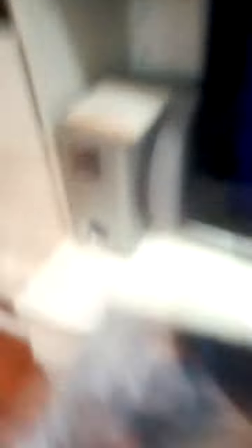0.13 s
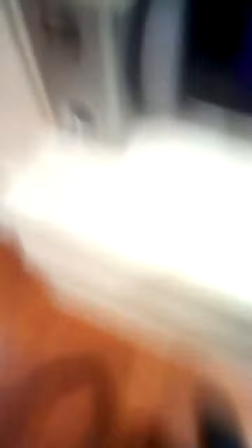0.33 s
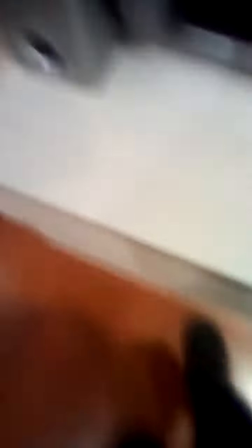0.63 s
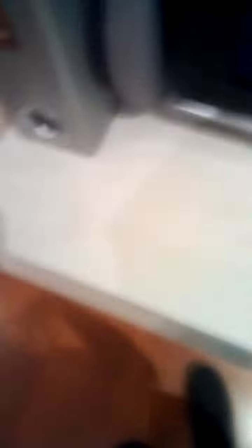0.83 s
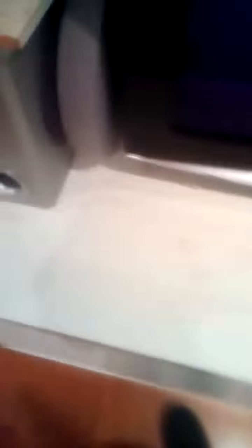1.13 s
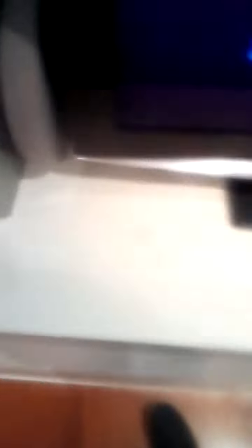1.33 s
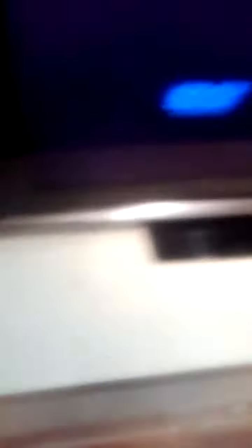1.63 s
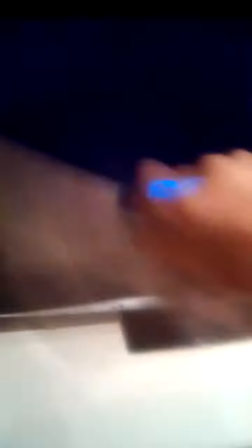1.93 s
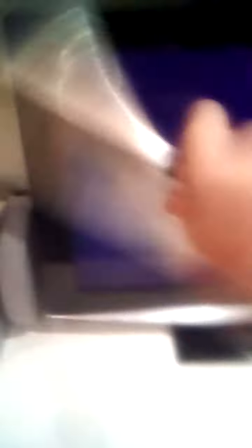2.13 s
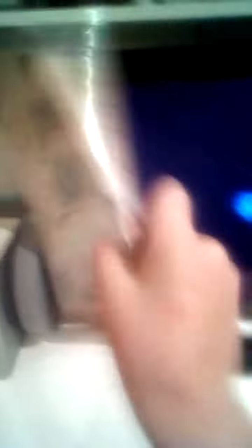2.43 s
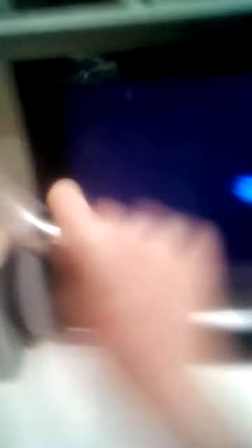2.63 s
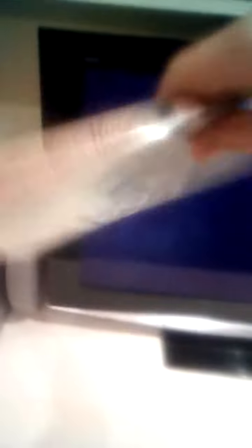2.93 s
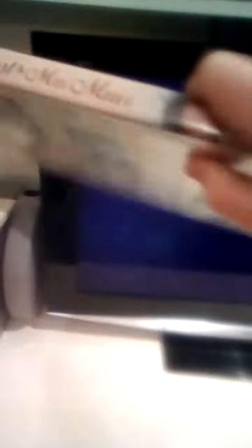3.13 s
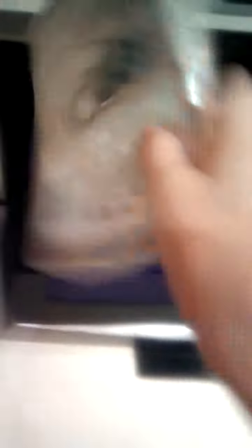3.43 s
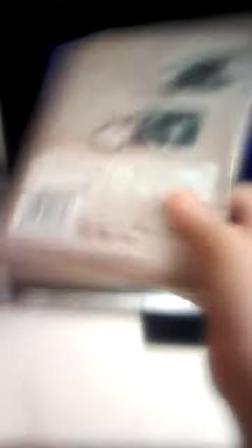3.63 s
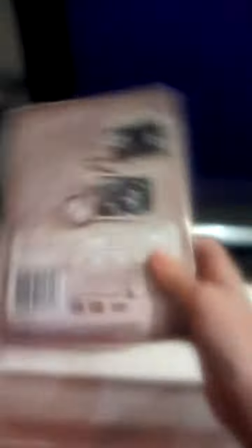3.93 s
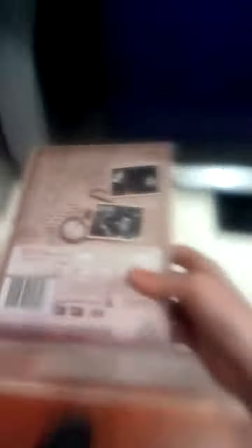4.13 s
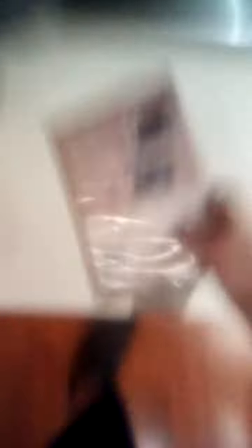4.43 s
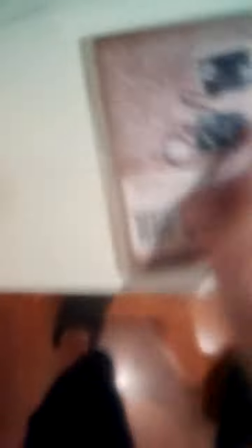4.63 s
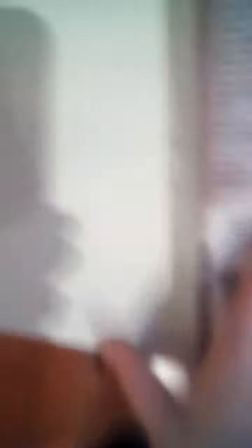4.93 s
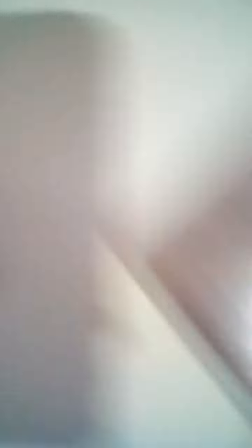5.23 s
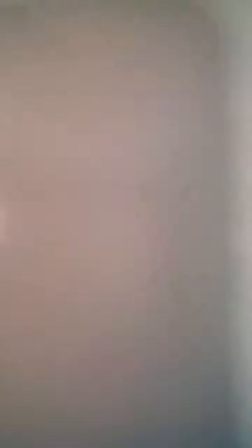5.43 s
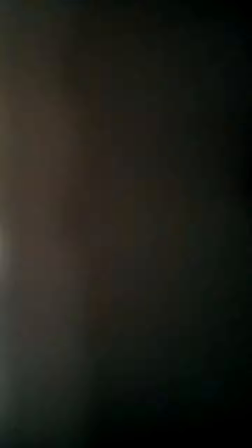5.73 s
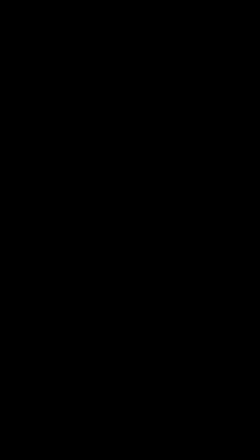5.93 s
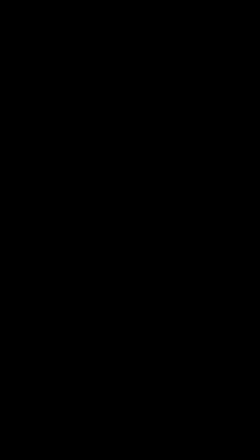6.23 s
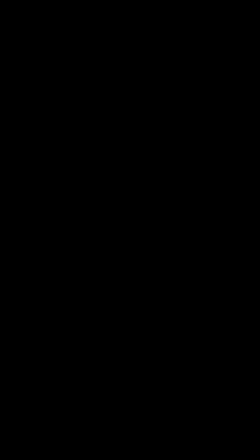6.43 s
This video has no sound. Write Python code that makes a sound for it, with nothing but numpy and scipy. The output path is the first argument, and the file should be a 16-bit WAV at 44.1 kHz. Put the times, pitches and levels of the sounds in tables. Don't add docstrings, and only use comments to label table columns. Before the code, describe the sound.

A small hard indoor room with a faint low hum and soft hiss; everything is close to a hand-held phone, stereo, with dulled, patchy treble. At 0 s loose plastic rattles lightly. From 0.38 to 0.65 s a run of hollow snaps and dull knocks comes with finger scrapes. It eases, then a snap at 1.23 s. From 1.4 to 2.7 s small catches click, a disc taps its hub, and two firmer snaps sound at 1.98 and 2.13 s; a bright skin brush at 2.5. Around 3 s it is nearly quiet, with tiny squeaks; light taps return at 3.5-4.05. The case lands at 4.22, then cracks very sharply at 4.42-4.6 with rattle and scraping. Softer thuds and rubbing run to 5.5. From 5.6 to 5.95 s the phone clatters down in loud, rapid booming knocks and hard ticks. A faint table tone fades under small rattles at 6.25-6.53 s.

```python
import sys
import numpy as np
from scipy import signal
from scipy.io import wavfile
from scipy.ndimage import uniform_filter1d, minimum_filter1d

SR = 44100
rng = np.random.default_rng(int(sys.argv[2]) if len(sys.argv) > 2 else 0)


def boost_factor(decibels):
    exponent = np.asarray(decibels, float) / 20
    return 10 ** exponent


def generate_wav(signal):
    frames = np.transpose(np.atleast_2d(signal))
    scaled = np.clip(frames, -1, 1) * 32767
    pcm = np.round(scaled).astype(np.int16)
    wavfile.write(sys.argv[1], SR, pcm)


N = 289737

# frequency in Hz, density in dB per Hz.
ROOM_NOISE = [(15, -51), (25, -33.5), (108, 4.5), (130, -15.5), (229, -13), (745, -21), (2540, -22.5),
              (4470, -26), (5030, -27), (7000, -28), (9100, -60.5), (15400, -120)]
# frequency in Hz, likeness from -1 to 1.
NOISE_LIKENESS = [(60, 0.88), (380, 0.34), (2380, -0.18), (15000, -0.05)]
# frequency in Hz, density in dB per Hz.
MIC_HISS = [(4410, -61), (7500, -12.5), (8670, -2), (9700, -9.5), (10500, -5.5), (12700, -8), (14900, 0.5),
            (15900, 2.5), (16000, -15), (16500, -31)]
# frequency in Hz, gain in dB.
MIC_RESPONSE = [(30, 4.5), (5500, 0.5), (6500, 2), (7600, -9), (8300, -18), (10500, -19.5), (13700, -24),
                (14300, -17.5), (15200, -14), (16200, -20), (16800, -66)]
# frequency in Hz, t60 in seconds.
ROOM_DECAY = [(200, 0.15), (1000, 0.32), (3000, 0.32), (7000, 0.37)]
# frequency in Hz, share of patches kept.
TREBLE_KEPT = [(7400, 1.), (8200, .8), (12000, .7), (14000, .3), (14400, 1.), (15500, 1.), (15750, .01)]

# time in seconds, rumble of the grip in dB, side of the case as left-right dB.
HANDS = [(0.0, -54.5, 2.5), (0.3, -65.5, 2.5), (0.5, -52.5, 8), (0.9, -67.5, 6), (1.24, -60, 10.5),
         (1.4, -62.5, 6.5), (1.68, -57.5, 3.5), (2.4, -62, -1.5), (2.8, -68, -3), (4.12, -62.5, -3),
         (4.25, -59.5, 4.5), (4.64, -49.5, -2.5), (4.78, -58, 2), (5.35, -58.5, 0), (5.46, -56.5, -0.5),
         (5.64, -61, -2), (5.78, -49, -3.5), (6.05, -62, -1)]
# start in seconds, length in seconds,
# scrape of the shell in dB, hiss of skin on the sleeve in dB.
STROKES = [(0, 0.24, -51, -53), (0.362, 0.17, -51, -48), (0.466, 0.1, -43.5, -50), (0.583, 0.15, -41, -50),
           (0.641, 0.23, -53, -46.5), (0.807, 0.24, -56, -56.5), (0.95, 0.35, -56.5, -55.5),
           (1.178, 0.17, -43.5, -48.5), (1.358, 0.15, -53, -58.5), (1.424, 0.23, -50, -48.5),
           (1.516, 0.22, -46.5, -54.5), (1.703, 0.26, -56, -61), (1.872, 0.12, -46, -54),
           (1.952, 0.24, -49.5, -56), (2.114, 0.7, -55, -61), (2.482, 0.13, -56, -46.5),
           (2.54, 0.16, -67, -54), (3.547, 0.95, -62.5, -76), (4.204, 0.68, -55.5, -62),
           (4.413, 0.22, -31, -38.5), (4.699, 0.19, -48, -55), (4.97, 0.48, -48.5, -52.5),
           (5.135, 0.11, -40, -42.5), (5.222, 0.29, -45, -47), (5.38, 0.25, -49.5, -51.5),
           (5.755, 0.07, -45, -43.5), (5.795, 0.37, -57.5, -60), (6.101, 0.36, -57.5, -57),
           (6.402, 0.13, -55.5, -57)]
# time in seconds, frequency in Hz, level over the shell in dB.
SCRAPED_PATCH = [(4.7, 1047, -23), (5.26, 878, -19), (5.29, 2058, -7.5), (5.385, 1889, -8), (5.41, 935, -1)]
# start in seconds, length in seconds, frequency in Hz,
# width in Hz, level in dB.
SWEEPS = [
    (1.574, 0.12, 453.7, 434.2, -50),
    (2.48, 0.11, 6760, 2000, -42),
    (4.335, 0.077, 6200, 2000, -55),
    (5.273, 0.13, 2030, 648, -50),
    (5.25, 0.22, 825, 432, -48),
    (5.363, 0.14, 3861, 1620, -54),
]
# start in seconds, length in seconds, frequency in Hz, level in dB.
SQUEAKS = [
    (2.937, 0.06, 5728, -70),
    (3.004, 0.04, 5222, -73),
    (3.056, 0.08, 5230, -75),
    (3.05, 0.06, 6350, -72),
    (3.19, 0.05, 1180, -69),
]

# start in seconds, peak in dB, ring in Hz, t60 in seconds.
BUMPS = [(4.838, -31, 122, 0.072), (4.901, -33.5, 136, 0.031), (5.02, -39, 139.6, 0.6),
         (5.38, -25, 590, 0.027), (5.599, -19, 278, 0.061), (5.642, -12.5, 284, 0.043),
         (5.674, -19.5, 248, 0.2), (5.699, -21.5, 132.5, 0.014), (5.727, -23, 360, 0.039),
         (5.746, -17, 150, 0.036), (5.812, -8, 308, 0.017), (5.861, -13, 117, 0.032),
         (5.896, -17, 120, 0.076), (5.916, -21.5, 86.3, 0.2), (5.9335, -17.5, 96, 0.088),
         (5.958, -25, 76.7, 0.1), (6.248, -31, 99.6, 0.099), (6.273, -38, 235, 0.1),
         (6.388, -34.5, 225.5, 0.26), (6.526, -26, 176, 0.13)]
# start in seconds, peak in dB, loudest ring in Hz,
# crack above 3 kHz in dB, left-right level in dB.
TICKS = [(5.569, -27, 1070, -4, 9.5), (5.601, -5.5, 830, -3.5, -1.5), (5.642, -14, 1100, -3, -2.5),
         (5.645, -7, 710, -15, -3), (5.676, -11, 2060, -3.5, -2), (5.693, -17, 2000, -5, -2),
         (5.698, -15, 1013, -3, 2.5), (5.728, -13, 669, -6, -3.5), (5.746, -19, 990, -9, -4),
         (5.814, -2.5, 730, -17.5, -1.5), (5.82, -15.5, 790, -7, 4.5), (5.863, -6.5, 1100, -15, -3),
         (5.87, -29, 1327, -5, -3), (5.898, -15, 850, -20, -1), (5.905, -27, 806, -18, 4),
         (5.919, -15, 700, -22.5, 6), (5.934, -18, 1000, -12, 0), (5.942, -27.5, 810, -20, 6.5),
         (5.977, -31.5, 1040, -27, -2)]
# start in seconds, peak in dB, frequency in Hz, t60 in seconds.
TABLE_SONG = (5.96, -50, 264, 1.5)
# frequency in Hz, t60 in seconds.
TABLE_MODES = [(215, 0.068), (575, 0.026)]
# start in seconds, low ring in dB, high ring in dB.
LANDINGS = [
    (4.2214, -33, -28.5),
    (4.2445, -39, -16),
    (4.7565, -26.5, -26),
    (4.7806, -35, -24),
]
# start in seconds, peak in dB, ring in Hz, t60 in seconds.
THUDS = [(0.383, -20.5, 175, 0.04), (0.491, -24.5, 520, 0.026), (0.517, -22.5, 385, 0.038),
         (0.619, -28.5, 144, 0.076), (0.641, -33.5, 190, 0.059), (1.227, -31.5, 110, 0.12),
         (1.78, -34, 556, 0.12), (1.825, -36.5, 470, 0.093), (4.255, -32, 514, 0.11),
         (4.421, -18.5, 380, 0.079), (4.586, -22, 418, 0.053)]
# start in seconds, peak in dB, frequency in Hz, t60 in seconds,
# left-right level in dB.
KNOCKS = [(0.493, -33.5, 566, 0.074, 3), (1.229, -40.5, 403, 0.05, 4), (1.787, -29, 372, 0.039, 3),
          (2.135, -29, 895, 0.044, -10), (2.135, -26.5, 3040, 0.046, -1.5), (3.73, -44, 2057, 0.12, 2),
          (4.047, -26, 1470, 0.0082, -2), (4.259, -52, 1010, 0.071, 4), (4.757, -43, 890, 0.035, 4),
          (5.033, -46.5, 172, 0.31, -23), (5.092, -35.5, 270, 0.026, -6), (5.474, -43, 256, 0.06, -9),
          (5.505, -45, 169, 0.13, -11), (5.601, -14, 682, 0.028, -5.5), (5.604, -16.5, 280, 0.031, -5.5),
          (5.645, -13.5, 677, 0.031, -1), (5.698, -29, 796, 0.026, -3), (5.728, -17, 407, 0.029, -9),
          (5.815, -14, 303, 0.036, 11.5), (5.934, -10, 970, 0.0058, -5), (5.935, -27.5, 398, 0.04, -16),
          (6.528, -33, 667, 0.061, -10)]

# frequency in Hz, width in Hz, level in dB.
SHELL = [(984, 63, -9.5), (2100, 62, -12), (2530, 58, -14), (3200, 260, -14), (3755, 91, -8),
         (4370, 140, -24), (5430, 82, -3)]
# start in seconds, peak in dB, loudest
# ring in Hz, crack above 3 kHz in dB, t60 in seconds.
CATCHES = [(1.409, -43.5, 940, -22, .06), (1.536, -36.5, 2470, -25, 0.072), (1.572, -36, 3070, -15, 0.037),
           (1.582, -41, 643, -16, .04), (1.591, -39, 676, -13, 0.06), (1.612, -39, 667, -22, 0.036),
           (1.636, -38, 2500, -16, 0.089), (1.774, -39, 1010, -18, 0.058), (1.835, -37, 2540, -27, 0.054),
           (1.885, -43.5, 972, -20, 0.059), (1.903, -38, 2220, -15, 0.079), (1.942, -40, 1040, -23, 0.056),
           (2.039, -43, 970, -24, 0.05), (2.15, -40.5, 2950, -12, 0.1), (2.196, -44, 930, -26, 0.021),
           (2.33, -47, 2170, -4, 0.09), (2.387, -36, 2530, -27.5, 0.04), (2.397, -41, 1420, -18, 0.079),
           (2.534, -40, 2550, -20, 0.14), (2.596, -49, 930, -14, .04), (2.634, -46, 2100, -27, 0.1),
           (2.745, -48, 1510, -14, 0.077), (3.61, -47, 900, -16, 0.033), (3.811, -46.5, 2100, -8, 0.044),
           (3.916, -46, 1200, -26, .05), (4.021, -57, 974, -16, .04), (4.91, -53.5, 750, -7, 0.083),
           (4.969, -41.5, 977, -17, 0.025), (5.061, -45, 925, -27, 0.033), (5.135, -38.5, 970, -22, .05),
           (5.197, -36.5, 980, -12, 0.041), (5.251, -40, 920, -32, 0.099), (5.444, -39.5, 800, -25, 0.056),
           (5.516, -41, 800, -18, 0.044), (5.563, -50, 1000, -6, 0.012), (5.966, -40, 890, -29, 0.016),
           (0.004, -37.5, 1030, -13, 0.19), (0.47, -41, 520, -17.5, .05), (0.497, -35, 604, -18, 0.071),
           (0.548, -43, 2500, -11, 0.018), (0.613, -31, 1970, -9, 0.051), (0.657, -34, 2270, -23, 0.032),
           (0.678, -39, 990, -6, 0.068), (2.904, -56, 1120, -9, 0.045), (3.025, -52, 2200, -8.5, 0.083),
           (3.534, -52, 1288, -23, 0.04), (4.041, -37, 2100, -29.5, 0.027), (4.047, -27.5, 1500, -45, 0.04),
           (4.463, -27, 3000, -19, 0.042), (4.471, -29.5, 930, -12, .05), (4.484, -28, 950, -12, .04),
           (4.531, -32, 930, -17, 0.081), (4.608, -20, 2880, -23, 0.055), (4.621, -21, 3200, -16, 0.03),
           (4.638, -27.5, 3150, -13.5, 0.082), (4.675, -39, 960, -24, 0.051),
           (6.061, -50, 1100, -23, 0.055), (6.406, -42, 2600, -14, 0.035), (6.437, -48, 2210, -7, 0.056),
           (6.499, -44.5, 1010, -23, 0.092), (6.534, -30.5, 2560, -12.5, 0.067)]
# start in seconds, peak in dB, loudest ring in Hz,
# crack above 3 kHz in dB.
TAPS = [(1.916, -34.5, 1080, -15), (1.926, -32, 1070, -25.5), (2.09, -29, 1020, -17),
        (2.222, -38, 980, -39), (2.277, -38.5, 1000, -12.5), (2.378, -36.5, 1020, -15),
        (2.405, -42.5, 1600, -8), (2.441, -35.5, 1060, -24), (2.452, -32.5, 1070, -12),
        (2.625, -34.5, 1052, -23), (2.733, -44, 950, -28), (3.495, -50.5, 2700, -10),
        (3.645, -39, 1030, -15.5), (3.668, -42, 964, -24), (3.716, -32, 2060, -18), (3.728, -29, 1960, -22),
        (3.881, -43, 995, -33.5)]
# start in seconds, peak in dB, loudest ring in Hz,
# crack above 3 kHz in dB, t60 in seconds.
RATTLES = [(0.022, -32, 2190, -18, 0.2), (0.083, -37, 1060, -32, 0.22), (0.271, -41, 800, -14, 0.094),
           (0.462, -41.5, 896, -9, 0.063), (0.491, -36, 730, -7, 0.15), (0.534, -27.5, 730, -19, 0.019),
           (1.31, -33, 1520, -14.5, 0.013), (1.49, -37, 805, -35, 0.15), (1.785, -34.5, 700, -29, 0.059),
           (1.824, -35.5, 830, -17, 0.052), (4.291, -40, 2100, -30, 0.069), (4.368, -40.5, 2070, -6, 0.086),
           (4.613, -21.5, 900, -13, 0.067), (4.635, -25, 885, -13, 0.028), (5.02, -32.5, 740, -22, 0.025),
           (6.247, -40.5, 1140, 0.5, 0.046), (6.367, -31.5, 1170, -19, 0.061),
           (6.389, -35.5, 1160, -15.5, 0.14)]
# start in seconds, peak in dB, loudest ring in Hz,
# crack above 3 kHz in dB, t60 in seconds.
SNAPS = [(0.3805, -20.5, 1010, -26, 0.033), (0.384, -23, 850, -11.5, 0.068),
         (0.518, -17.5, 1690, -11.5, 0.06), (0.567, -26, 3170, -13, 0.076), (0.619, -18, 990, -16, 0.024),
         (0.643, -25, 845, -6.5, 0.027), (0.794, -46, 1890, -8.5, 0.27), (0.848, -35.5, 1800, -12, 0.034),
         (1.196, -56, 730, 3, 0.0746), (1.231, -21, 1380, -10.5, 0.016), (1.976, -15.5, 1740, -23.5, 0.043),
         (2.134, -17.5, 1800, -11.5, 0.021), (4.423, -2.5, 3290, -16, 0.047), (4.443, -7, 930, -9, 0.027),
         (4.57, -7, 1890, -18, 0.022), (4.589, -7, 950, -24, 0.038), (4.604, -17, 990, -15, 0.054),
         (4.838, -31, 840, -22, 0.011), (4.851, -34.5, 770, -6, 0.019), (4.99, -31.5, 990, -19, 0.038),
         (6.274, -28.5, 880, -11.5, 0.14), (6.528, -34, 1050, -12, 0.2)]


def evened(x):
    return x / np.sqrt(np.mean(x ** 2) + 1e-20)


def read(points, hz):
    f, value = np.transpose(points)
    return np.interp(np.log(hz + 1), np.log(f + 1), value)


def curves(rows):
    s, *columns = np.transpose(rows)
    return [np.interp(np.arange(N) / SR, s, column) for column in columns]


def placed(rows):
    s, _, pan_db = np.transpose(HANDS)
    return [(*row[:-1], np.interp(row[0], s, pan_db), row[-1]) for row in rows]


def band(x, lo_hz, hi_hz):
    return signal.sosfilt(signal.butter(2, [lo_hz, hi_hz], "band", fs=SR, output="sos"), x)


def ring(x, hz, width):
    return signal.lfilter(*signal.iirpeak(hz, hz / width, SR), x)


def unlike(noise, same):
    same = np.clip(same, -1, 1)
    return np.array([noise[0], same * noise[0] + np.sqrt(1 - same ** 2) * noise[1]])


def add(mix, s, pair, pan_db):
    for side, sign in enumerate((1, -1)):
        start = round(s * SR - sign * 1.1 * pan_db)
        part = mix[side, start:][:pair.shape[1]]
        part += boost_factor(sign * pan_db / 2) * pair[side, :len(part)]


def steady(spectrum, db, same):
    hz = np.fft.rfftfreq(1024, 1 / SR)
    a, b = rng.standard_normal((2, 2, N // 256 + 5, 513))
    z = unlike(a + 1j * b, read(same, hz)) * boost_factor(read(spectrum, hz))
    noise = signal.istft(z.swapaxes(1, 2), nperseg=1024, noverlap=768)[1][:, :N]
    return boost_factor(db) * evened(noise)


def room_noise():
    return steady(ROOM_NOISE[:-2], -59.5, NOISE_LIKENESS)


def room(x):
    taps = np.zeros((2, SR))
    at = np.arange(200, SR - 20, 20) + rng.integers(0, 20, (2, (SR - 201) // 20))
    np.put_along_axis(taps, at, rng.choice([-1., 1.], at.shape), 1)
    hz, t, z = signal.stft(taps, SR, nperseg=256)
    decay = boost_factor(-60 * t / read(ROOM_DECAY, hz)[:, None])
    tail = signal.istft(z * decay, SR, nperseg=256)[1]
    return signal.fftconvolve(x.mean(0)[None], tail / np.linalg.norm(tail[0]), axes=1)[:, :N]


def squeaks():
    out = np.zeros((2, N))
    for s, length, hz, db in SQUEAKS:
        whistle = evened(ring(rng.standard_normal((2, round(length * SR))), hz, 23.5))
        add(out, s, boost_factor(db) * whistle * signal.windows.tukey(whistle.shape[1], .4), -2.)
    return out


def sweeps():
    out, t = np.zeros((2, N)), np.arange(8192) / SR
    for s, length, hz, width, db in SWEEPS:
        clumps_db = 2.5 * evened(uniform_filter1d(rng.standard_normal(len(t)), size=120))
        grains = rng.standard_normal((2, len(t))) * boost_factor(clumps_db)
        scrape = evened(ring(ring(grains, hz, width), hz, width))
        swell = np.sin(np.pi * np.minimum(t / length, 1))
        add(out, s, boost_factor(db) * scrape * swell, -1.5)
    return out


def strokes():
    rest_db = (-88, -68.5)
    lean, swell = 0.71, 1.56
    power = np.outer(boost_factor(rest_db) ** 2, np.ones(N))
    for s, length, *levels_db in STROKES:
        part = power[:, round(s * SR):][:, :round(length * SR)]
        u = np.arange(part.shape[1]) / SR / length
        part += np.outer(boost_factor(levels_db) ** 2, abs(np.sin(np.pi * u ** lean)) ** (2 * swell))
    return 10 * np.log10(power)


def shell(x, broad_db):
    rings = sum(boost_factor(db) * ring(ring(x, hz, w), hz, 3 * w) for hz, w, db in SHELL)
    return boost_factor(broad_db) * band(x, 552.0, 5400.0) + rings


def rubbing():
    scrape_db, hiss_db = strokes()
    rumble_db, pan_db = curves(HANDS)
    hz, patch_db = curves(SCRAPED_PATCH)
    clumps_db = 2.1 * evened(uniform_filter1d(rng.standard_normal(N), 250))
    grains = boost_factor(clumps_db + 0.78 * np.minimum(rng.exponential(1, N), 5))
    slips = unlike(rng.standard_normal((2, N)), 0.073) * grains

    turn = np.exp(2j * np.pi * np.cumsum(hz) / SR)
    patch = (turn * signal.lfilter([1], [1, -np.exp(-np.pi * 420. / SR)], slips / turn)).real
    scraped = evened(shell(slips, 0.)) + boost_factor(patch_db) * evened(patch)
    scrape = boost_factor(scrape_db - 4.0) * evened(band(scraped, 270.0, 2600))

    snags_per_s, snag_db = 400, -16
    snags = rng.standard_normal((2, N)) * (rng.random(N) < snags_per_s / SR)
    scrape += boost_factor(scrape_db + snag_db - patch_db - 15.5) * evened(shell(snags, 1.5))

    hiss = boost_factor(hiss_db + 1.17) * evened(band(slips, 4340.0, 15700))
    lumps = boost_factor(2.5 * evened(uniform_filter1d(rng.standard_normal(N), 1500)))
    grip = band(unlike(rng.standard_normal((2, N)), 0.96), 41, 390.0)
    rumble = boost_factor(rumble_db + 0.5) * evened(lumps * grip)
    return (scrape + hiss + rumble) * boost_factor(np.outer([.5, -.5], pan_db))


def table_song():
    out, t = np.zeros((2, N)), np.arange(SR) / SR
    s, db, hz, t60 = TABLE_SONG
    add(out, s, boost_factor(db - 60 * t / t60) * np.sin(2 * np.pi * hz * t) * np.ones((2, 1)), -4.)
    return out


def landings():
    out, t = np.zeros((2, N)), np.arange(8192) / SR
    for s, *levels_db, pan_db, _ in placed([(*row, 0) for row in LANDINGS]):
        rings = sum(boost_factor(db - 60 * t / t60) * np.sin(2 * np.pi * hz * t)
                    for db, (hz, t60) in zip(levels_db, TABLE_MODES))
        add(out, s, rings * np.ones((2, 1)), pan_db)
    return out


def thuds():
    out, t = np.zeros((2, N)), np.arange(8192) / SR
    bumps = [(s, db, hz, -6.5, t60) for s, db, hz, t60 in BUMPS]
    rows = placed(THUDS) + bumps
    for (s, db, hz, pan_db, t60), noise in zip(rows, rng.standard_normal((len(rows), 2, len(t)))):
        decay = boost_factor(-60 * t / max(t60, .01))
        push = np.exp(-(t / 0.00021 - 2) ** 2)
        blur = band(unlike(noise, 0.85) * decay - push, 0.43 * hz, 2.26 * hz)
        modes = sum(np.sin(2 * np.pi * hz * k * t * [[1], [1.04]]) * share
                    for k, share in ((0.93821, 0.75), (0.74327, 0.57), (1.3, 0.17)))
        tone = .3 if s < 5.55 or hz > 200 else 1.1
        sound = tone * modes * decay ** .65 + blur / abs(blur).max()
        add(out, s + 0.00156, boost_factor(db) * sound / abs(sound).max(), pan_db)
    return out


def knocks():
    out, t = np.zeros((2, N)), np.arange(8192) / SR
    for s, db, hz, t60, pan_db in KNOCKS:
        rung = -np.sin(2 * np.pi * hz * t) * np.tanh(t / 0.00038) * boost_factor(db - 60 * t / t60)
        add(out, s, rung * np.ones((2, 1)), pan_db)
    return out


def clicks(rows, shell_db, broad_db, same, rise, spike, spread, top_hz=10000):
    out, t = np.zeros((2, N)), np.arange(4096) / SR
    for (s, db, hz, crack_db, pan_db, t60), noise in zip(rows, rng.standard_normal((len(rows), 2, len(t)))):
        chatter = unlike(noise, same) * np.minimum(t / rise, 1) * boost_factor(-60 * t / max(t60, .004))
        chatter -= spike * np.exp(-(t / .00005 - 2) ** 2)
        rung = boost_factor(shell_db) * shell(chatter, broad_db)
        body = band(band(ring(chatter, hz, spread * hz) + rung, 263.0, 3160.0), 270.1, 5400)
        crack = band(chatter * boost_factor(-60 * t / 0.29) + 0.38 * rung, 3760.0, top_hz)
        sound = body / abs(body).max() + boost_factor(crack_db + 11) * crack / abs(crack).max()
        add(out, s, boost_factor(db) * sound, pan_db)
    return out


def phone_ticks():
    rows = [(*row, 0.0038) for row in TICKS]
    phone = clicks(rows, -6.0, -0.77, 0.69, rise=0.0001, spike=0.44, spread=0.25, top_hz=15500)
    phone += boost_factor(-4.0) * band(phone, 5700, 11000)
    phone += boost_factor(-14.5) * ring(phone, 2400, 410)
    return phone


def chirr(x):
    t = np.arange(2048) / SR
    buzz = band(rng.standard_normal((2, len(t))), 680.0, 4100.0) * boost_factor(-60 * t / 0.024)
    return boost_factor(-16.5) * signal.oaconvolve(x, buzz / np.linalg.norm(buzz[0]), axes=1)[:, :N]


def small_catches():
    rows = placed(sorted(CATCHES))
    return clicks(rows, 0., -13.5, 0.55, rise=0.0007, spike=0.17, spread=0.11)


def case_snaps():
    case = clicks(placed(SNAPS), -1.6, -5.0, 0.07, rise=0.00017, spike=2.02, spread=0.13)
    loose = sorted(RATTLES + [(*row, 0.056) for row in TAPS])
    case += clicks(placed(loose), 7., -18., .4, rise=.0015, spike=.2, spread=.1)
    return case + boost_factor(8.0) * ring(case, 14900, 700)


def scene():
    case, phone = case_snaps(), phone_ticks()
    low = thuds() + table_song() + landings()
    small = small_catches() + knocks()
    wet = boost_factor(-8.5) * case + boost_factor(-25.5) * phone + boost_factor(-6.5) * low + boost_factor(-13.5) * small
    background = room_noise() + room(wet)
    fingers = squeaks() + sweeps() + rubbing()
    return background + fingers + low + small + phone + chirr(phone) + case


def thinned(x):
    hz, _, z = signal.stft(x, SR, nperseg=1024, noverlap=768)
    chance = uniform_filter1d(rng.standard_normal((65, z.shape[2])), size=9, axis=1)
    rank = np.repeat(.5 + .5 * np.tanh(.85 * evened(chance)), 8, axis=0)[:len(hz)]
    treble = (abs(z[:, hz > 3000]) ** 2).sum((0, 1))
    onset = ~minimum_filter1d(treble < 8 * np.roll(treble, 3), size=3)
    keep = (rank < read(TREBLE_KEPT, hz)[:, None]) | onset
    return signal.istft(z * keep, SR, nperseg=1024, noverlap=768)[1][:, :N]


def masked(x):
    hz, _, z = signal.stft(x, SR, nperseg=256, noverlap=192)
    power = (abs(z) ** 2).sum(0)
    blow = -minimum_filter1d(-power[hz > 1500].max(0), size=31, origin=10)
    patches = uniform_filter1d(uniform_filter1d(power, size=5, axis=0), size=5, axis=1)
    upper = (hz > 1500) & (hz < 17000)
    faint = (patches < blow * boost_factor(2 * -54)) & upper[:, None]
    return signal.istft(z * ~faint, SR, nperseg=256, noverlap=192)[1][:, :N]


def roll_off(x):
    return signal.sosfilt(signal.butter(12, 16700, fs=SR, output="sos"), x)


def record(dry):
    hz = np.linspace(0, SR / 2, 1025)
    colour = signal.minimum_phase(signal.firwin2(1023, hz, boost_factor(2 * read(MIC_RESPONSE, hz)), fs=SR))
    heard = band(signal.oaconvolve(dry, colour[None], axes=1)[:, :N], 56.5, 19000)
    heard += steady(MIC_HISS, -75.0, [(100, 0), (200, 0.025)])
    heard /= (1 + (heard / .95) ** 4) ** .25
    mix = masked(thinned(heard))
    return roll_off(mix)


dry = scene()
out = record(dry)
generate_wav(out)
```